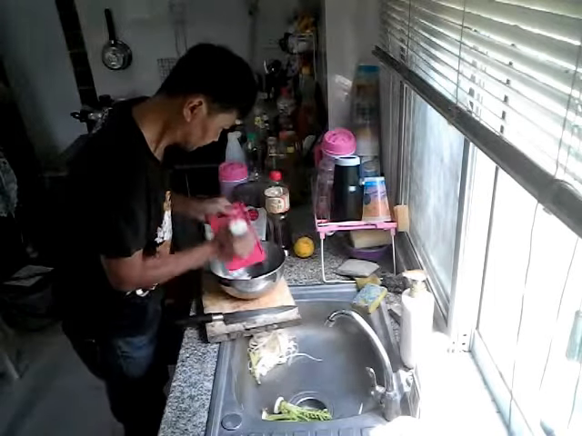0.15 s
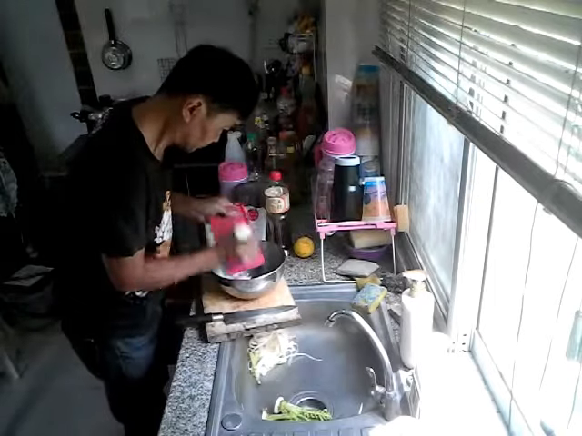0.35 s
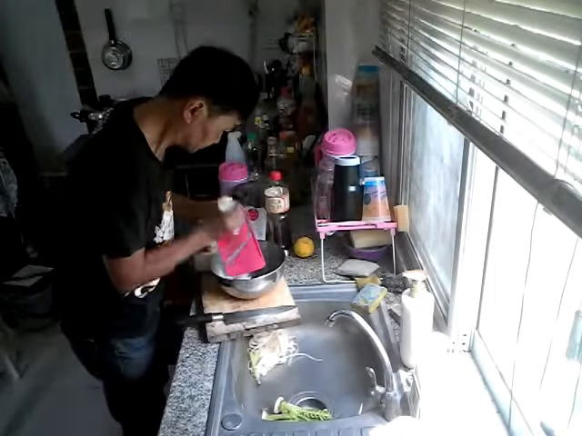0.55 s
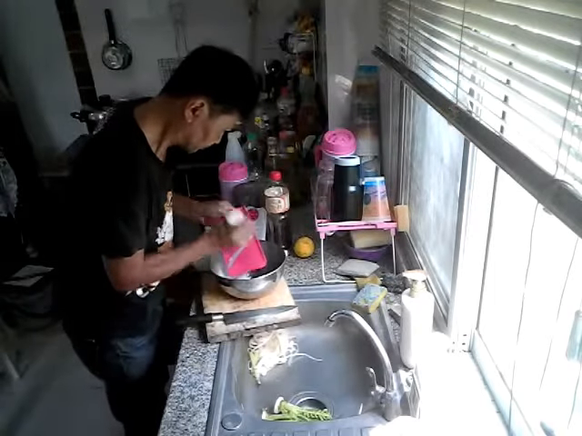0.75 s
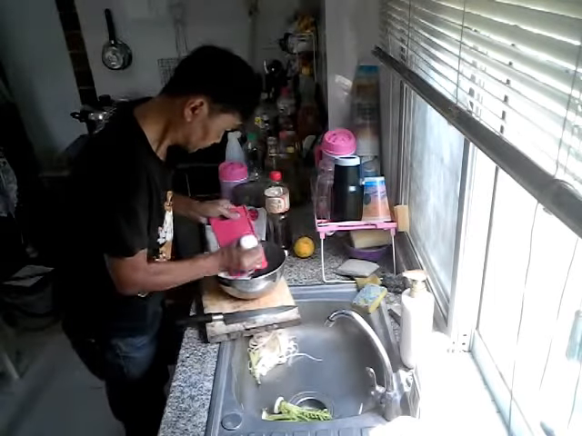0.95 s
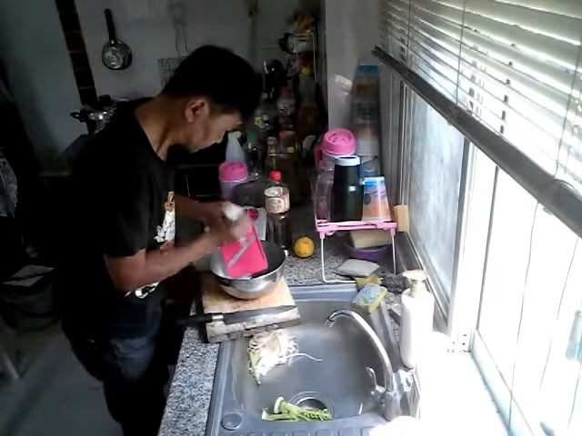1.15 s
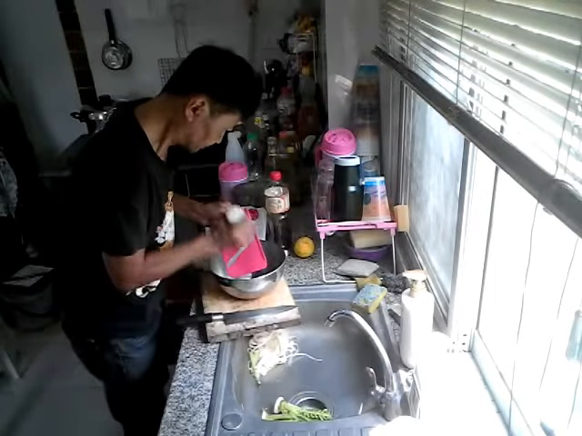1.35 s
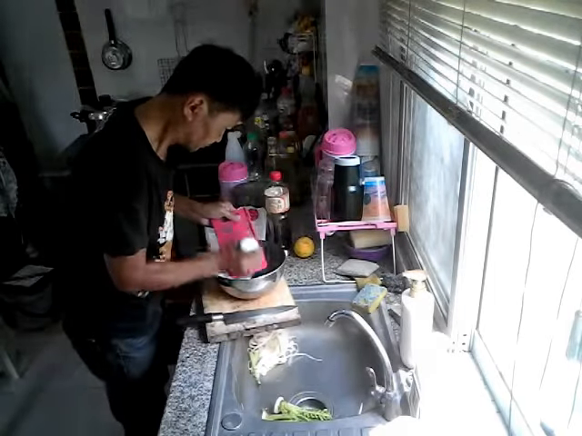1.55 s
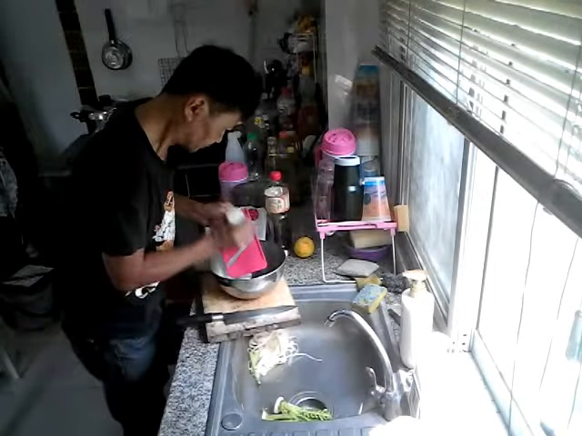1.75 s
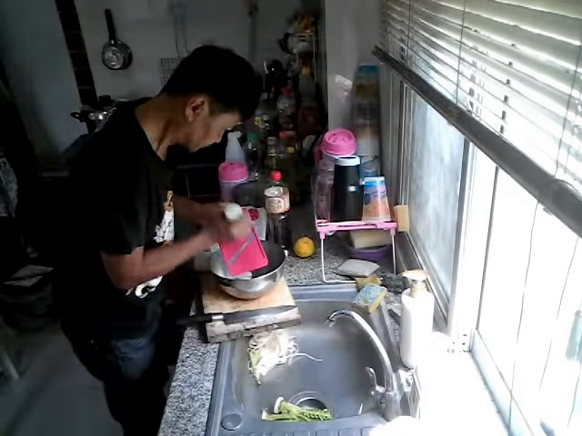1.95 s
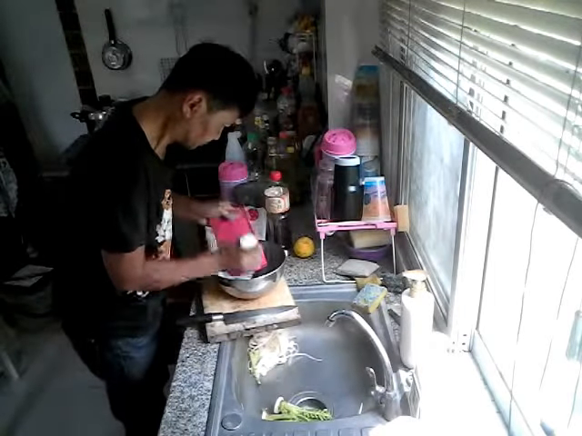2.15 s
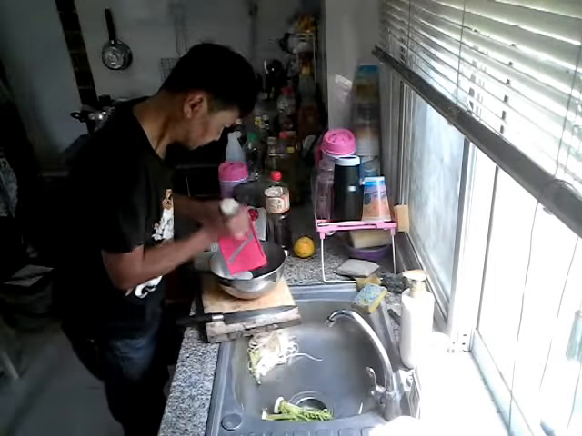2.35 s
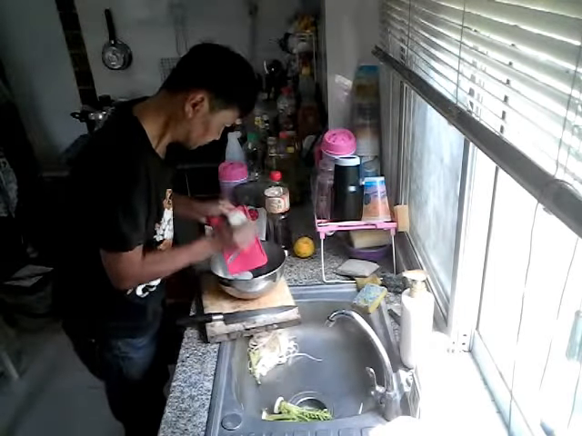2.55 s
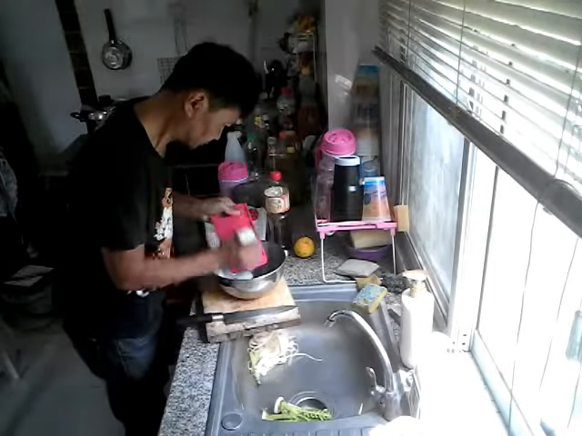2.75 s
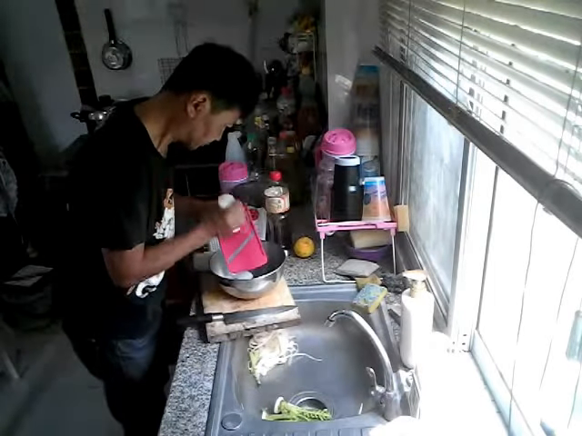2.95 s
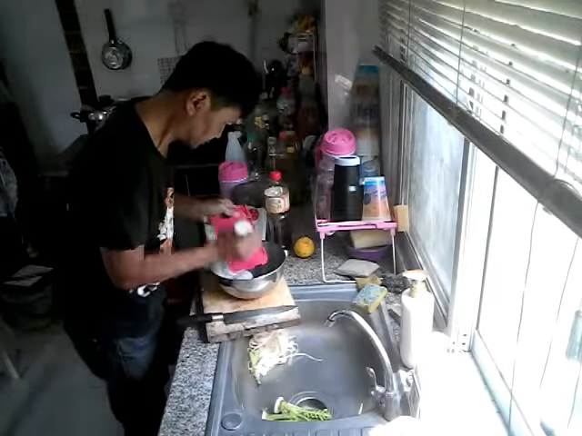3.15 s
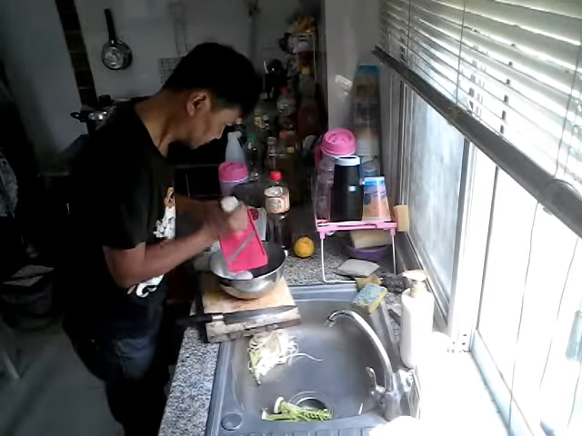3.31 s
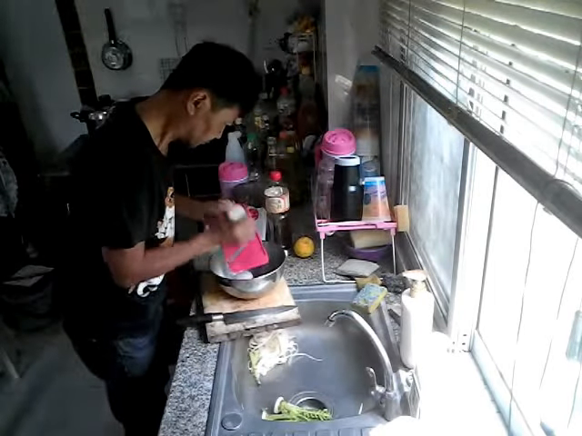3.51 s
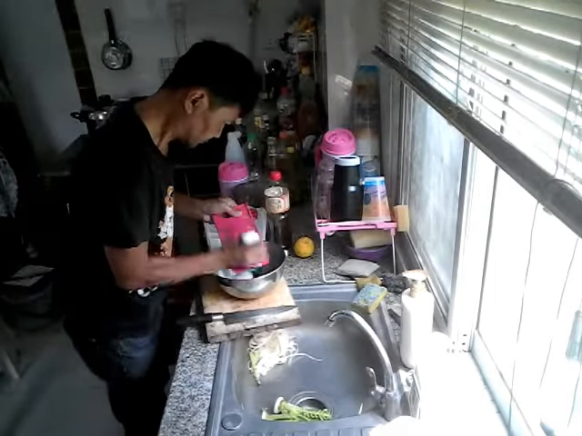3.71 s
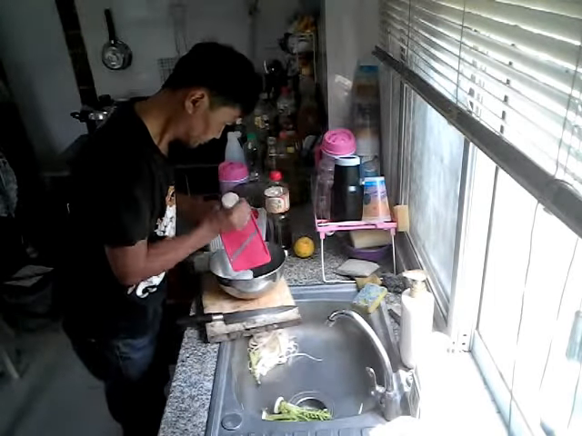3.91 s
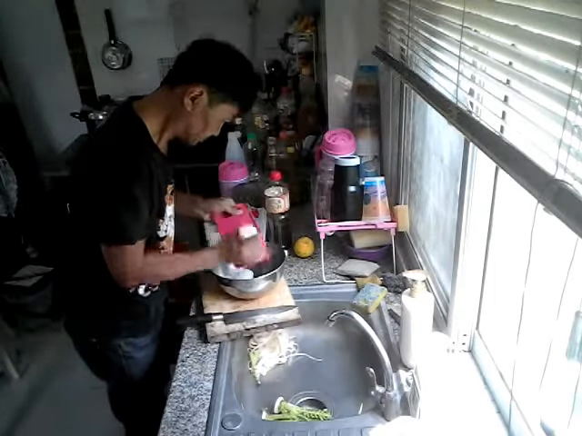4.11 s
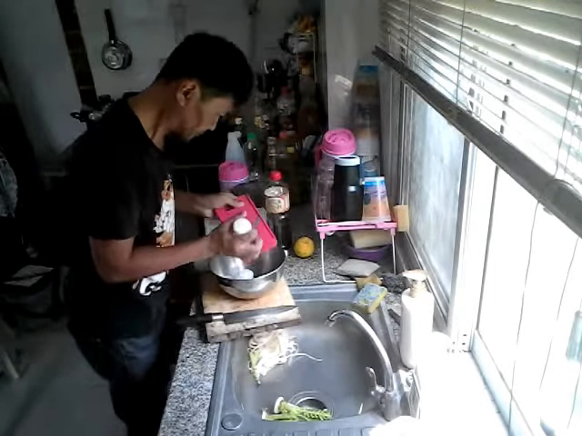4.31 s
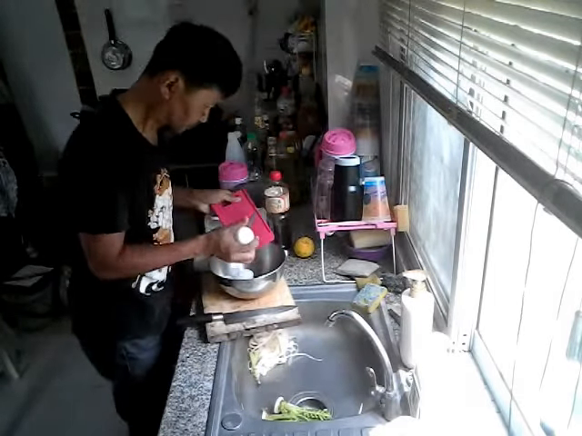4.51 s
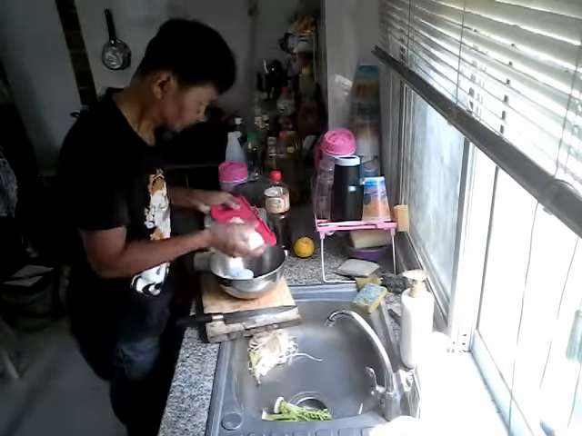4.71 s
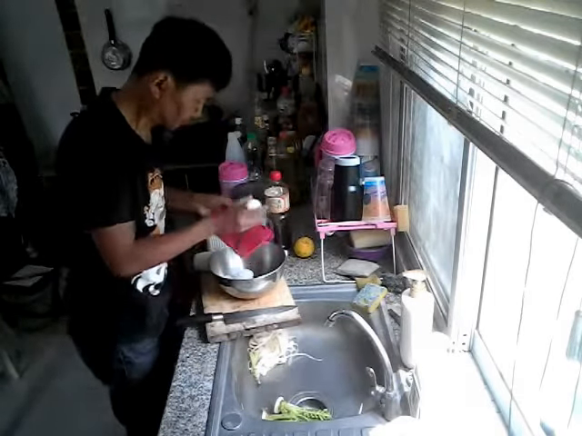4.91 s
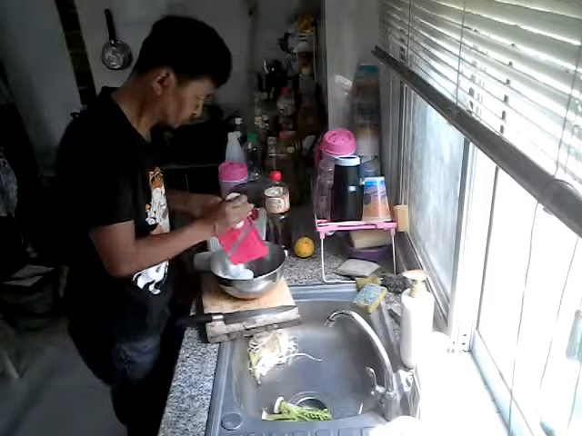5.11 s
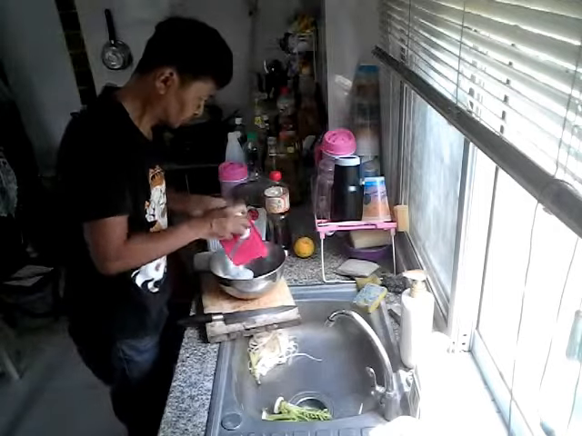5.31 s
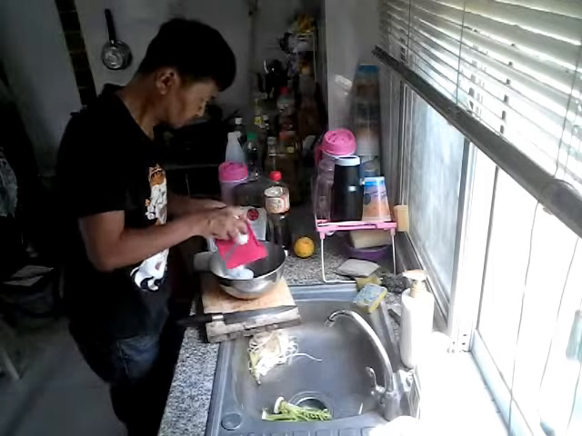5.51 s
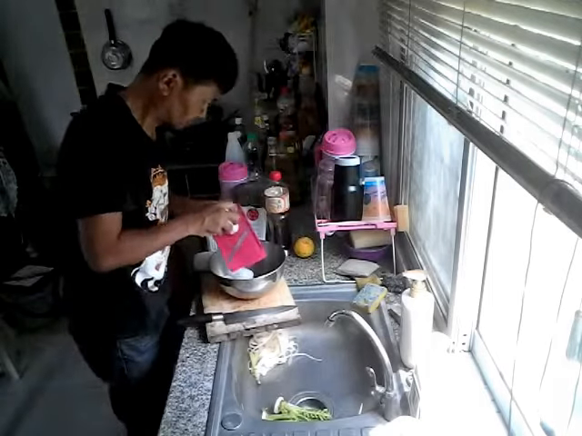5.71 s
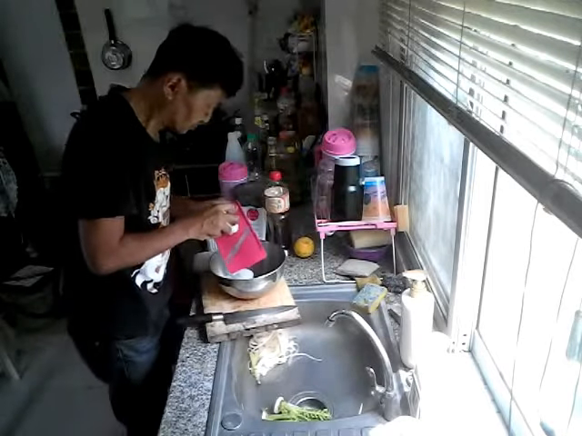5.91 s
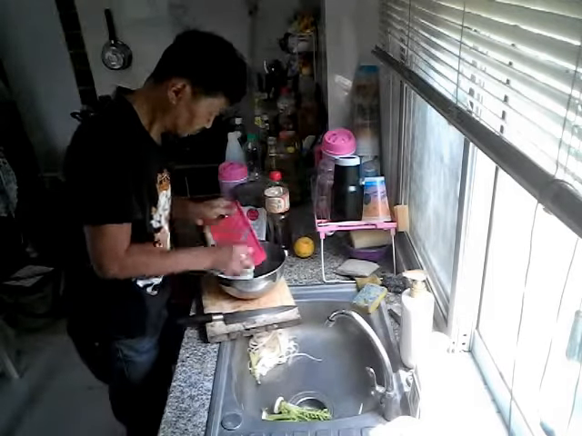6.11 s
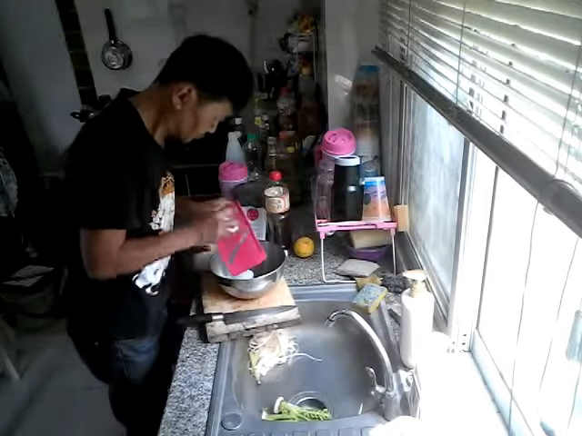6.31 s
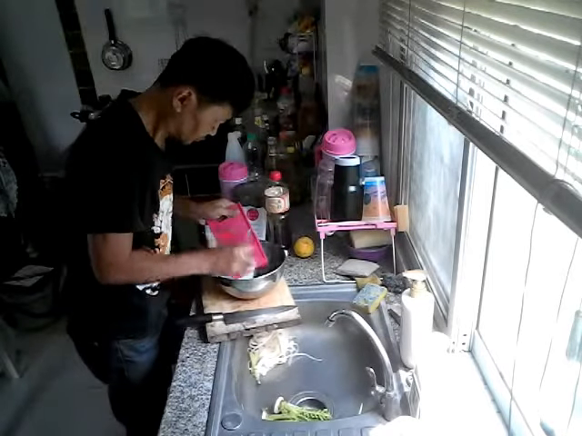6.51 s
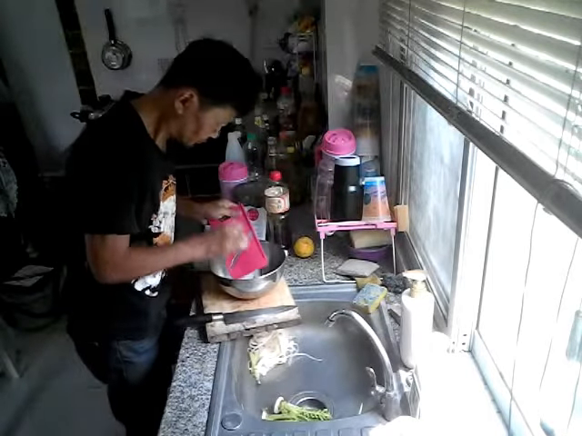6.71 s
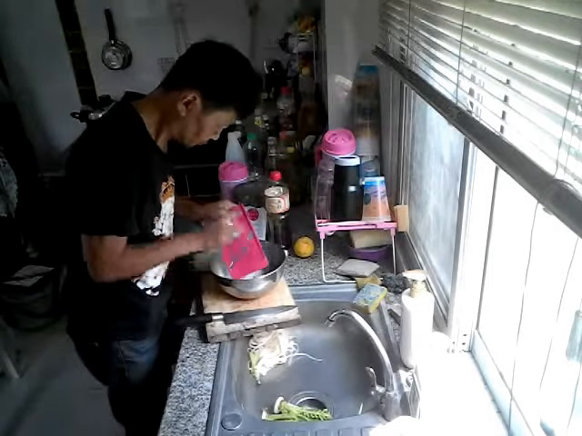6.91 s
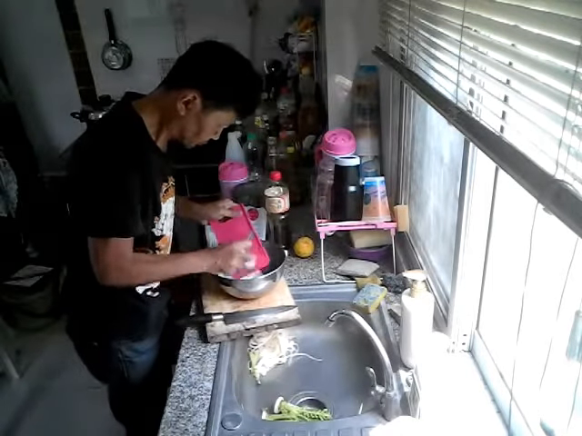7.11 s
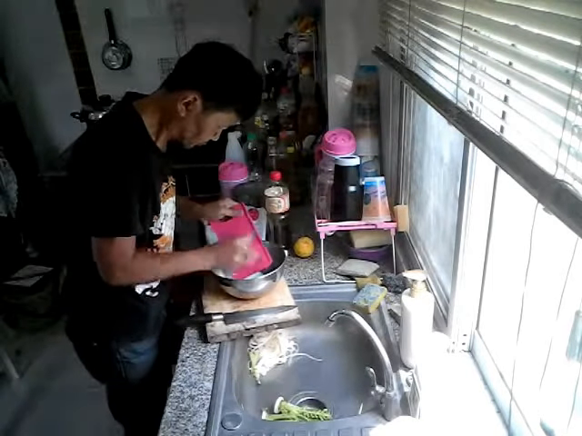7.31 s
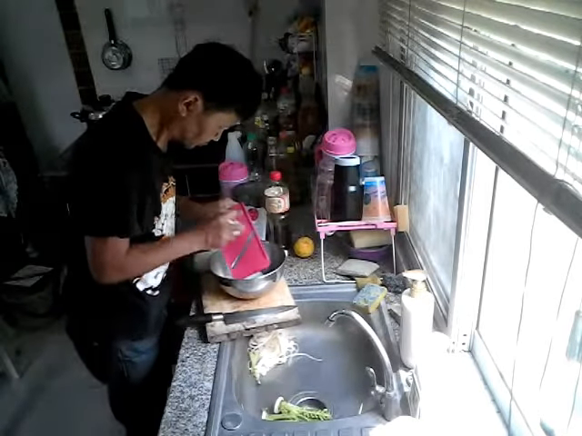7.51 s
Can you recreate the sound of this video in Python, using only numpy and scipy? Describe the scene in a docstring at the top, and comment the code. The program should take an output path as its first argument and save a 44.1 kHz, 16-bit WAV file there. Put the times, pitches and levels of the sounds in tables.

```python
"""Slicing a turnip

A turnip is pushed over a plastic hand slicer that rests in a steel bowl, in a small kitchen.
In each stroke the blade crunches through the flesh, then the turnip breaks free and knocks the slicer
against the bowl. Drawn back, it drops on to the ramp with a soft bump. The wet flesh ticks and squeaks
on the plastic. The work pauses once, leaving room hum and a faint high whine."""
import sys
import numpy as np
from scipy import signal
from scipy.fft import rfft, irfft
from scipy.io import wavfile

SR = 44100
rng = np.random.default_rng(int(sys.argv[2]) if len(sys.argv) > 2 else 0)


def pcm_store(signal):
    """Save signal as 16-bit PCM."""
    levels = np.round(np.clip(np.atleast_2d(signal), -1, 1) * 32767)
    wavfile.write(sys.argv[1], SR, levels.astype(np.int16).T)


N = 332955
TIME = np.arange(N) / SR

# Levels in the tables are relative. A ring time (t60) is how long a sound takes to fade by 60 dB.
# tone colour of the steady room noise: f/Hz, level/dB
ROOM_COLOUR = [(20, -37), (40, -15.5), (60, -7.5), (80, 1.5), (110, -4.5), (280, -8), (400, -9),
               (1000, -14.5), (3000, -23.5), (4600, -31), (5600, -35.5), (9000, -41), (12500, -29),
               (16000, -30.5)]
# tones of the room's hum: f/Hz, level/dB
HUM_TONES = [(199.2, -79), (301.5, -73.5)]
# tone colour of the faint noise that differs between left and right: f/Hz, level/dB
SIDE_COLOUR = [(15, -73), (25, -41), (105, -3), (242, -1.5), (1230, -7.5), (4020, -15.5), (5000, -28.5),
               (12500, -21), (16000, -17)]
# modes (natural ringing tones) of the steel bowl: f/Hz, level/dB, ring time/s
BOWL_MODES = [(592, -3, 0.4), (1153, 13.5, 0.31), (1223, 6, 0.68), (1706, -6, 0.33), (2160, -11, 0.27)]
# low modes of the slicer's frame and the board under the bowl: f/Hz, level/dB, ring time/s
FRAME_MODES = [(73, -17.5, 0.26), (114.4, -10, 0.17), (205.7, 2.5, 0.1), (240, 4, 0.077), (379, -1, 0.088),
               (445, 3.5, 0.082), (490.5, -7, 0.2), (568.6, -2.5, 0.12), (637, 2, 0.031)]
# modes of the slicer pressed on bowl and board: f/Hz, level/dB, ring time/s
SLICER_MODES = [(122.6, -11.5, 0.17), (219.6, -14, 0.08), (239, -18.5, 0.26), (297.4, -10, 0.099),
                (396, -7.5, 0.32), (473.5, -0.5, 0.061), (497, -8.5, 0.44), (521, -4.5, 0.044),
                (601, 6, 0.11), (675.5, -2.5, 0.074), (770.4, -2, 0.1), (801, -3, 0.083),
                (888, -18.5, 0.27), (938, -3.5, 0.16), (997, -3, 0.043), (1050, 3, 0.064), (1166.7, 2, 0.1),
                (1265, -7, 0.11), (1392, -15.5, 0.13), (1603, -10, 0.072), (1753, -12, 0.088),
                (1892, -13.5, 0.063), (2010, -10.5, 0.042), (2160, -10, 0.038), (2720, -15, 0.059)]
# tone colour of struck plastic: f/Hz, level/dB
PLASTIC_COLOUR = [(25, -9), (60, -37), (130, -13.5), (250, -8), (500, 2), (1000, 5), (1400, -0.5),
                  (2100, -7), (2900, -13), (5000, -18.5), (8000, -10), (16000, -23)]
# tone colour of bursting cells: f/Hz, level/dB
CRUNCH_COLOUR = [(300, 0.5), (1200, 4), (2300, -4.5), (3200, -6), (4000, -4), (5000, -1), (6500, -3.5),
                 (7700, 5.5), (8800, -6), (9700, -8), (11500, -2.5), (13500, -2), (16000, -5)]
# tone colour of the rasping slicer: f/Hz, level/dB
RASP_COLOUR = [(25, -32), (80, -8), (200, -12), (400, -10), (580, -4.5), (700, 2), (1000, -1), (1200, -8.5),
               (2200, -4), (4000, -10), (12000, -21.5)]
# tone colour of a wet tick: f/Hz, level/dB
TICK_COLOUR = [(200, -30), (700, -13), (1300, 0), (4000, -1), (6000, -4), (7700, -1), (10000, -13),
               (16000, -11)]
# the turnip lands back on the ramp: t/s, level/dB
LANDINGS = [(0.052, 0), (0.335, -5.5), (0.621, -0.5), (0.911, -5), (1.201, 0), (1.483, -5.5), (1.78, -2),
            (2.088, -7), (2.404, 2), (2.721, 2.5), (3.039, -2.5), (3.358, -2), (3.661, -6.5), (3.993, -1),
            (5.803, 1), (6.375, -5.5), (6.732, 5), (7.015, 1), (7.212, 3), (7.302, 9)]
# forward strokes: blade enters t/s, slice parts t/s, bite level/dB, push level/dB, knock level/dB
CUTS = [(0.126, 0.162, -6, 2.5, -2.5), (0.408, 0.446, -4, 1.5, 1.5), (0.696, 0.735, -8, .5, 1),
        (0.9809, 1.0186, 5, 1, 2.5), (1.269, 1.31, -16, 3.5, 3.5), (1.561, 1.5986, -6, 1, 2),
        (1.853, 1.8929, 1, 2.5, -6.5), (2.18, 2.2195, 1, -0.5, 0), (2.479, 2.5186, -2.5, 0, 7.5),
        (2.797, 2.835, 1.5, 2, -3.5), (3.122, 3.163, -0.5, 2, -5), (3.44, 3.4806, 3, -0.5, -4.5),
        (3.737, 3.7768, -14, 3, 0), (4.066, 4.1062, -6, 1.5, 1), (6.124, 6.164, -2.5, -8, -21),
        (6.501, 6.5513, 7, -3, -4), (6.81, 6.848, 4.5, -0.5, 1.5), (7.107, 7.144, 3, 4, 1),
        (7.38, 7.4191, 3, -2, -3)]
# how firmly the hand holds the slicer down: t/s, grip (0 loose, 1 firm)
HAND_GRIP = [(0.16, .3), (1.2, 0.027), (1.9, 0.19), (2.25, 0.8), (2.85, 0.39), (3.2, 0.49), (4.1, 0.55),
             (6.5, 0.76), (7.4, 0.81)]
# small wet ticks: t/s, level/dB
WET_TICKS = [(0.1724, -37), (0.217, -46.5), (0.4578, -33), (1.026, -36), (2.1145, -50.5), (3.299, -55),
             (3.7869, -39), (5.5325, -39.5)]
# wet flesh slips on the plastic: loudest at t/s, half length/s, f/Hz, width/Hz, level/dB
SLIPS = [(3.304, 0.0065, 7700, 250, -58), (5.733, 0.056, 13300, 120, -71), (5.802, 0.13, 12540, 400, -72.5),
         (6.33, .05, 7660, 200, -79), (7.155, 0.013, 4340, 230, -55.5), (7.431, 0.012, 4270, 175, -54.5)]
# the kitchen's echo, band by band: f/Hz, ring time/s, level/dB
ECHO_BANDS = [(97, 1, -15), (290, 0.46, -5), (877, 0.5, -12), (2010, 0.37, 0.5), (4600, 0.53, -5),
              (7240, 0.37, -5.5), (14100, 0.41, -5)]


def from_db(db):
    """Turn decibels into a factor to multiply by."""
    return 10 ** (np.asarray(db) / 20)


def unit_energy(x):
    """Scale a sound to an energy of one."""
    return x / np.sqrt(np.sum(x ** 2) + 1e-20)


def add(track, s, sound):
    """Lay a sound on the track, starting at s seconds."""
    at = int(s * SR)
    track[at:at + len(sound)] += sound[:max(N - at, 0)]


def through(x, response):
    """Pass a sound through something, given how that thing answers a single click."""
    return signal.fftconvolve(x, response)[:len(x)]


def colour(table, size=4096):
    """A click with the table's tone colour, for use as a filter."""
    hz, db = np.transpose(table)
    log_hz = np.log(np.maximum(np.fft.rfftfreq(size, 1 / SR), 1))
    gains = from_db(np.interp(log_hz, np.log(hz), db))
    cepstrum = irfft(np.log(gains))
    cepstrum[1:size // 2] *= 2      # folding this packs the energy at the start (minimum phase)
    cepstrum[size // 2 + 1:] = 0
    return unit_energy(irfft(np.exp(rfft(cepstrum))))


def soften(x, hz, order=2):
    """Turn down the treble above hz, as a soft contact does."""
    return signal.sosfilt(signal.butter(order, min(hz, SR / 3), fs=SR, output="sos"), x + 1e-18)


def drift(rate_hz):
    """A smooth random wobble with a spread of one."""
    slow = soften(rng.standard_normal(N + SR), rate_hz)[SR:]
    return slow / slow.std()


def fade(t60):
    """Half a second of a curve that falls 60 dB every t60 seconds."""
    return np.exp(-np.log(1000) * TIME[:SR // 2] / t60)


def ring(table):
    """A body rings after one touch; where it is hit and held shifts each mode's level and pitch."""
    hz, db, t60 = np.transpose(table)[:, :, None]
    shift_db = rng.normal(0, 2, hz.shape)
    detune = rng.normal(0, .003, hz.shape)
    tones = fade(t60) * np.sin(2 * np.pi * hz * (1 + detune) * TIME[:SR // 2])
    signs = (-1) ** np.arange(len(table))      # neighbouring modes start in opposite directions
    gains = signs * from_db(db + shift_db)[:, 0]
    return unit_energy(gains @ tones)


def burst(t60):
    """A dense spray of tiny contacts that dies away."""
    return unit_energy(fade(t60) * rng.standard_normal(SR // 2))


def grip_at(s):
    """How firmly the hand holds the slicer at s seconds."""
    return np.clip(np.interp(s, *np.transpose(HAND_GRIP)), 0, 1)


def background(whine_hz=4870, wander_hz=35, whine_db=-86, flutter=0.72):
    """Steady room noise, a wavering hum and a faint, fluttering whine."""
    noise = from_db(-67) * through(rng.standard_normal(N + SR), colour(ROOM_COLOUR))[SR:]
    hum = sum(from_db(db) * (.5 + drift(rate_hz=19.3)) * np.sin(2 * np.pi * hz * TIME)
              for hz, db in HUM_TONES)
    flicker = 1 + flutter * drift(rate_hz=71)
    pitch_hz = whine_hz + wander_hz * drift(rate_hz=36)
    whine = flicker * np.sin(2 * np.pi * np.cumsum(pitch_hz) / SR)
    return noise + hum + from_db(whine_db + 1.2 * drift(rate_hz=5.5)) * whine


def lingering(bowl_db=-27, hiss_db=-36, fade_in_s=.003):
    """The work is already under way: bowl and room still ring from the stroke before."""
    out = np.zeros(N)
    add(out, 0, from_db(bowl_db) * ring(BOWL_MODES))
    add(out, 0, from_db(hiss_db) * through(burst(t60=0.61), colour(CRUNCH_COLOUR)))
    return out * (1 - np.exp(-TIME / fade_in_s))


def bumping(bump_db=-20.5, settle_s=0.00487):
    """Soft flesh lands on the ramp and settles with a second touch, waking the frame's low modes."""
    out, plastic = np.zeros(N), colour(PLASTIC_COLOUR)
    for s, landing_db in LANDINGS:
        strength = from_db(bump_db + landing_db)
        add(out, s, strength * ring(FRAME_MODES))
        puff = strength * soften(plastic, hz=354, order=3)
        add(out, s, puff)
        add(out, s + settle_s, 0.76 * puff)
        edge = soften(through(burst(t60=0.13), plastic), hz=3400, order=1)
        edge_db = -25 + .7 * landing_db - 9.5 * grip_at(s)      # a firm grip damps the bump's hard edge
        add(out, s, from_db(edge_db) * edge)
    return out


def snaps(size, per_s, spread_db):
    """Cells and fibres break at random moments, making clicks of uneven size."""
    sizes = from_db(spread_db * np.minimum(rng.exponential(1, size), 4))
    signs = rng.choice([-1, 1], size)
    clicks = sizes * signs * (rng.random(size) < per_s / SR)
    return clicks / clicks.std()


def blade_load(t, length_s, entry_db, release_s):
    """The slanted blade bites ever more flesh until the slice parts, then the load falls off."""
    travel = np.minimum(t / length_s, 1)
    release = np.exp(-np.maximum(t - length_s, 0) / release_s)
    return from_db(entry_db * (1 - travel) ** 2) * release


def cutting():
    """Bursting cells hiss straight into the air; tougher fibres tug the blade, so the slicer rasps."""
    hiss, rasp, t = np.zeros(N), np.zeros(N), TIME[:SR // 2]
    plastic = colour(PLASTIC_COLOUR)
    for start, free, bite_db, push_db, _ in CUTS:
        cell_load = blade_load(t, free - start + 0.0042, entry_db=-11.5, release_s=0.023)
        cells = cell_load * snaps(len(t), per_s=6000, spread_db=3)
        add(hiss, start, from_db(-49.5 + 0.29 * push_db) * cells)
        fibre_load = blade_load(t, free - start, entry_db=-5.5, release_s=0.017)
        fibres = from_db(-45.5 + push_db) * fibre_load * snaps(len(t), per_s=1800, spread_db=-1)
        jolt = from_db(-22 + bite_db) * burst(t60=0.051)      # the blade first tears into the flesh
        tug = fibres + jolt
        add(rasp, start, through(tug, ring(SLICER_MODES)) + 1.09 * through(tug, plastic))
    uneven_flesh = from_db(0.76 * drift(rate_hz=29))
    crunch = through(hiss * uneven_flesh, colour(CRUNCH_COLOUR))
    return crunch + from_db(-11) * through(rasp, colour(RASP_COLOUR))


def knocking(loose_hz=3300, firm_hz=1280, rebound_s=.0095):
    """The freed turnip throws the slicer at the bowl: held loosely it bounces and rings, else it thuds."""
    out, plastic = np.zeros(N), colour(PLASTIC_COLOUR)
    for _, free, _, _, knock_db in CUTS:
        grip = grip_at(free)
        treble_hz = loose_hz * (firm_hz / loose_hz) ** grip
        hit, rebound = (free, -13), (free + rebound_s, -14 - 10.5 * grip ** 2)      # t/s, level/dB
        for s, db in hit, rebound:
            clack = ring(SLICER_MODES) + through(burst(t60=0.045), plastic)
            add(out, s, from_db(knock_db + db) * soften(clack, treble_hz, order=1))
        frame = from_db(14.5) * ring(FRAME_MODES)
        thump = from_db(27) * soften(through(burst(t60=0.065), plastic), hz=447)
        # a firm grip passes more weight to the board and damps the bowl
        add(out, free, from_db(-42 + 0.54 * knock_db + 11 * grip) * (frame + thump))
        add(out, free, from_db(-19 + knock_db - 12 * grip) * ring(BOWL_MODES))
    return out


def ticking():
    """Wet flesh clicks on the plastic: a sharp snap and a short patter."""
    clicks = np.zeros(N)
    for s, db in WET_TICKS:
        clicks[round(s * SR)] = from_db(db)
    patter = through(clicks, burst(t60=.014))
    return through(from_db(9.5) * clicks + from_db(11.5) * patter, colour(TICK_COLOUR))


def squeaking():
    """Wet flesh slips on the plastic: each slip is a short swell of a high, rough tone."""
    out, t = np.zeros(N), TIME[:SR] - .5
    for s, half_s, hz, width_hz, db in SLIPS:
        rough = soften(rng.standard_normal(SR), width_hz)
        tone = rough / rough.std() * np.sin(2 * np.pi * hz * t)
        swell = np.exp(-(t / half_s) ** 2)
        add(out, s - .5, from_db(db) * swell * tone)
    return out


def kitchen(x, build_s=0.0017):
    """Echoes from close walls thicken into a short tail that dies away band by band."""
    size, tail = SR // 2, 0
    hz, noise = np.fft.rfftfreq(size, 1 / SR), rfft(rng.standard_normal(size))
    centres = np.log(np.array(ECHO_BANDS)[:, 0])
    build_up = 1 - np.exp(-TIME[:size] / build_s)
    for share, (_, t60, db) in zip(np.eye(len(ECHO_BANDS)), ECHO_BANDS):
        band = irfft(noise * np.interp(np.log(hz + 1), centres, share), size)
        tail += from_db(db) * band * unit_energy(fade(t60) * build_up)
    return x + through(x, tail)


def scene():
    """All sounds sit straight ahead; left and right differ only by a little noise."""
    slicing = cutting() + knocking() + bumping() + ticking() + squeaking()
    middle = kitchen(slicing) + lingering() + background()
    side = from_db(-82.5) * through(rng.standard_normal(N), colour(SIDE_COLOUR))
    return np.array([middle + side, middle - side])


def record(dry):
    """Cut off the very highest treble steeply."""
    cutoff_hz = 15850
    return signal.sosfilt(signal.ellip(10, .1, 70, cutoff_hz, fs=SR, output="sos"), dry)


dry = scene()
out = record(dry)
pcm_store(out)
```